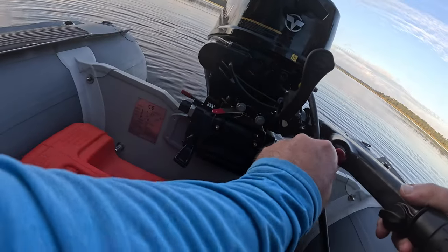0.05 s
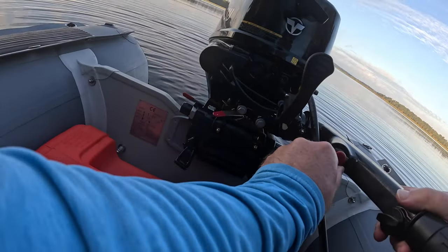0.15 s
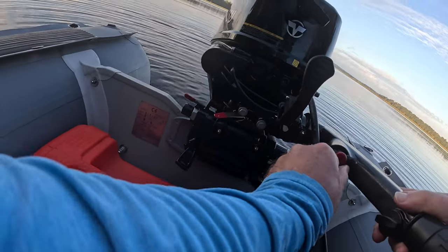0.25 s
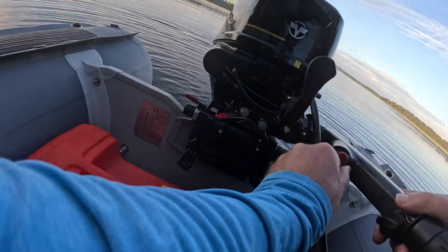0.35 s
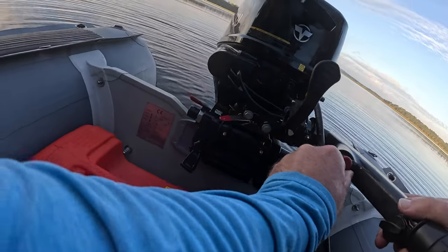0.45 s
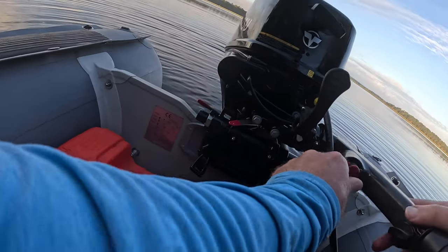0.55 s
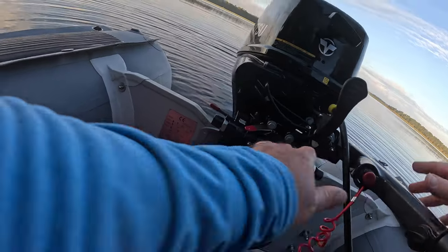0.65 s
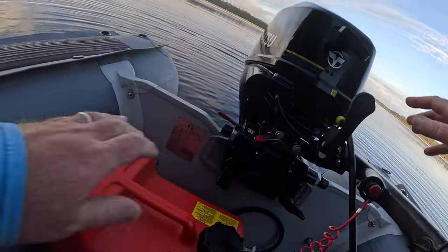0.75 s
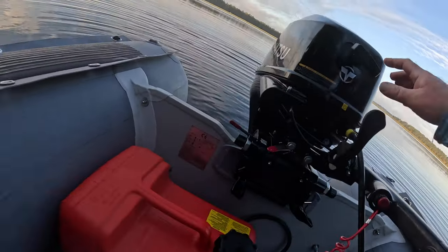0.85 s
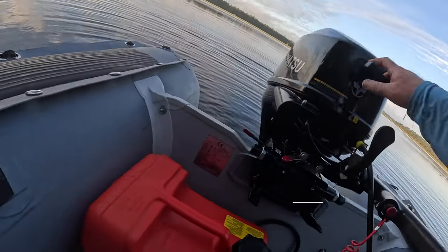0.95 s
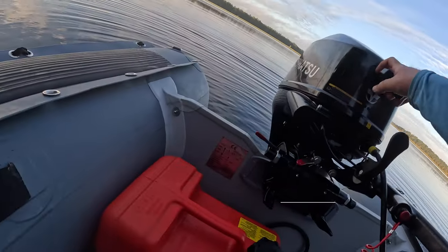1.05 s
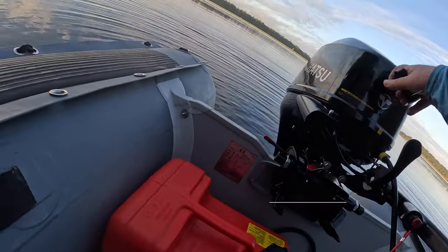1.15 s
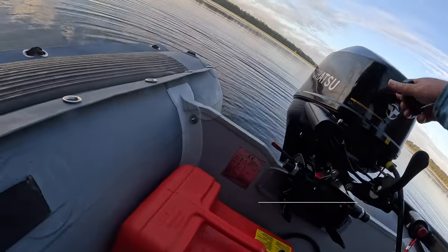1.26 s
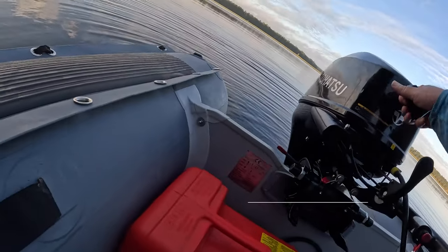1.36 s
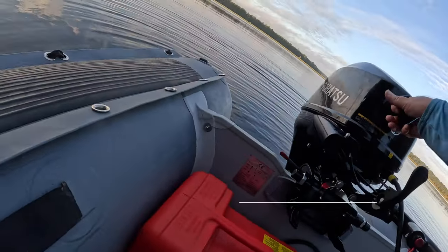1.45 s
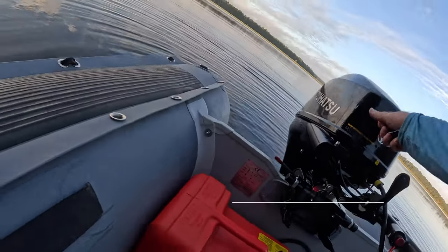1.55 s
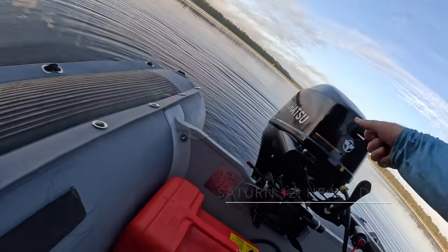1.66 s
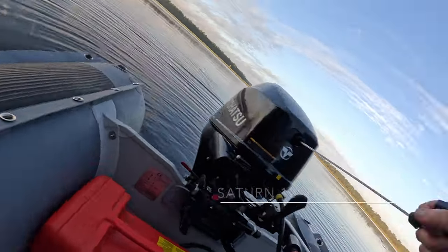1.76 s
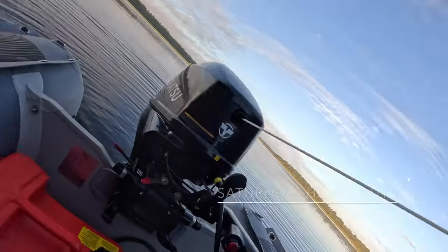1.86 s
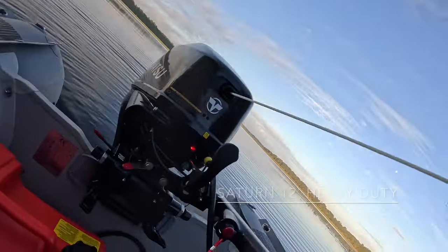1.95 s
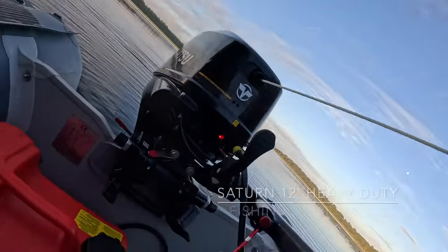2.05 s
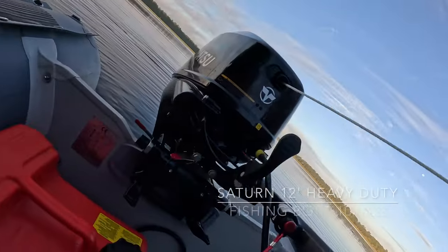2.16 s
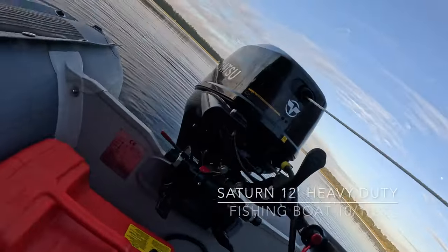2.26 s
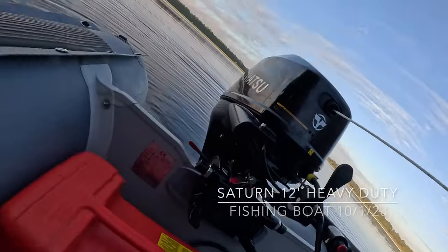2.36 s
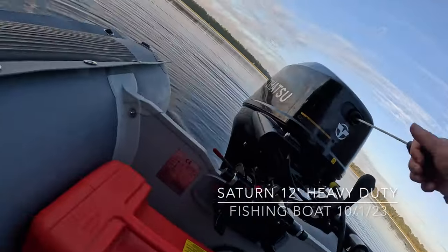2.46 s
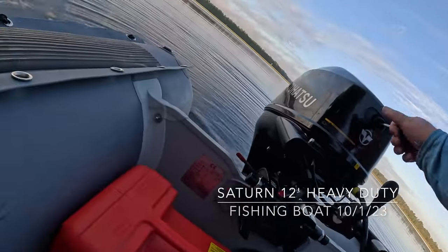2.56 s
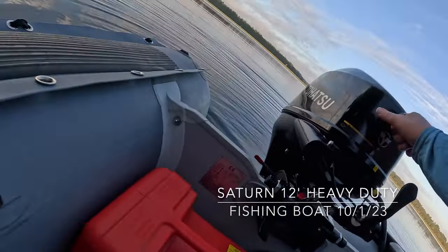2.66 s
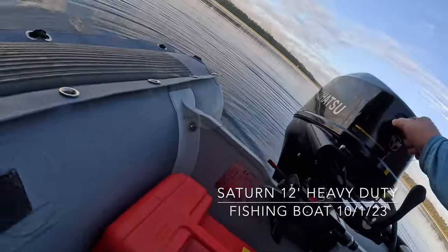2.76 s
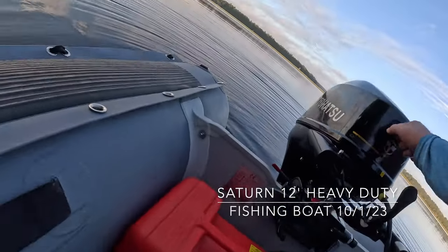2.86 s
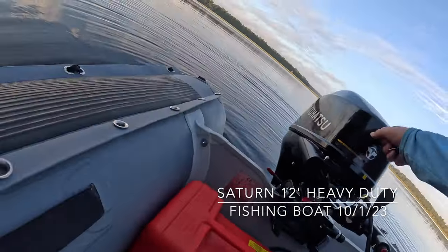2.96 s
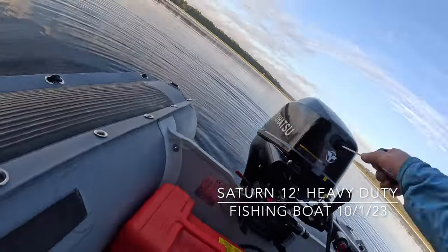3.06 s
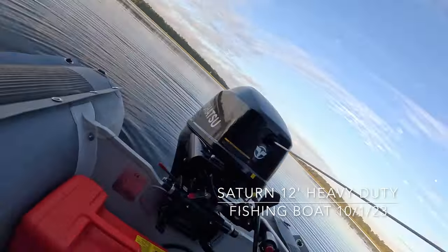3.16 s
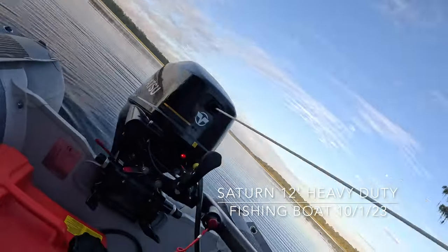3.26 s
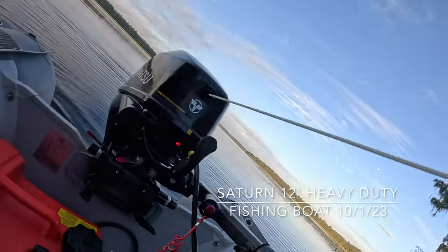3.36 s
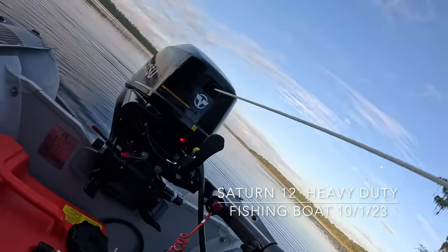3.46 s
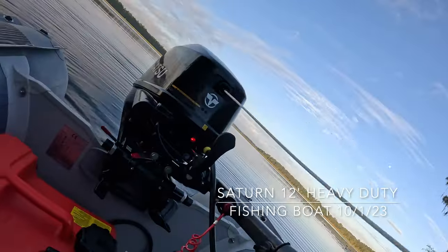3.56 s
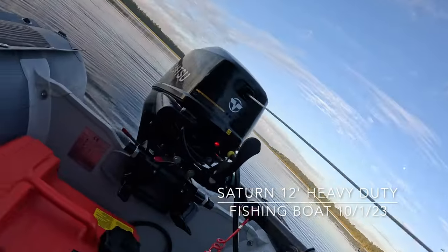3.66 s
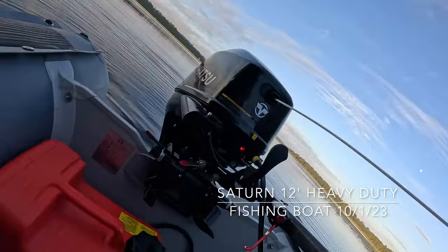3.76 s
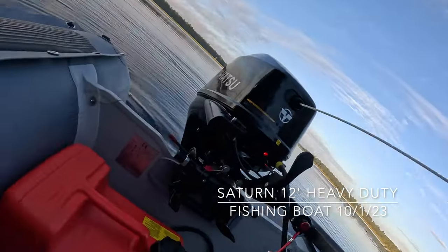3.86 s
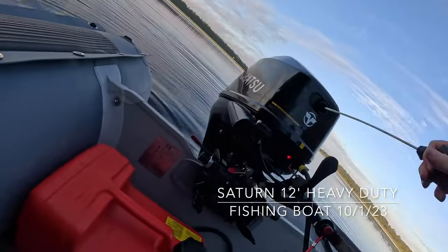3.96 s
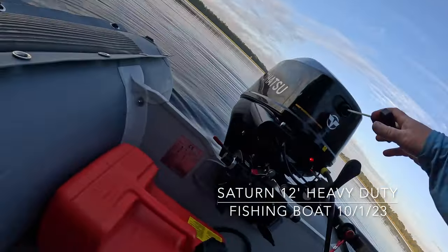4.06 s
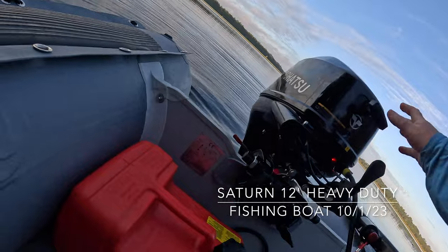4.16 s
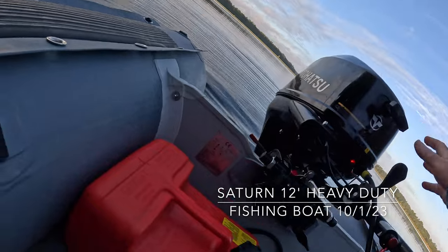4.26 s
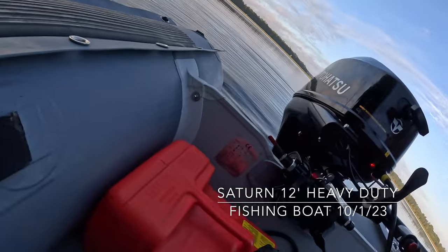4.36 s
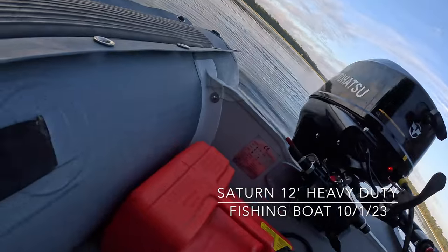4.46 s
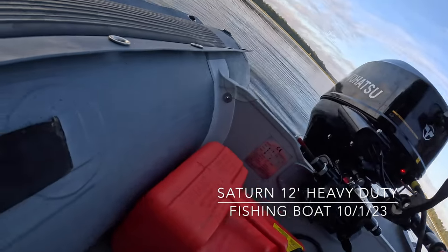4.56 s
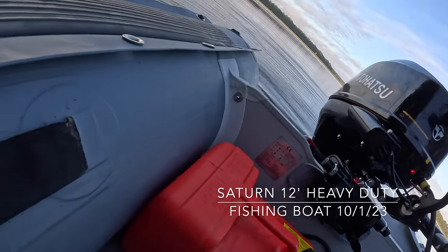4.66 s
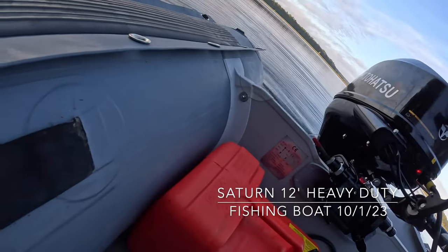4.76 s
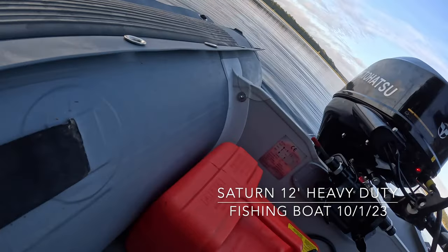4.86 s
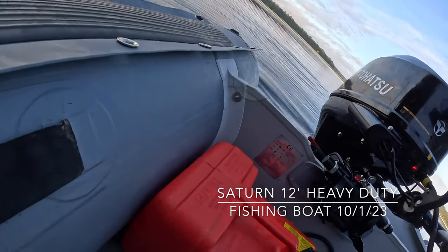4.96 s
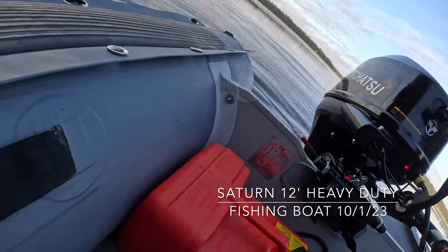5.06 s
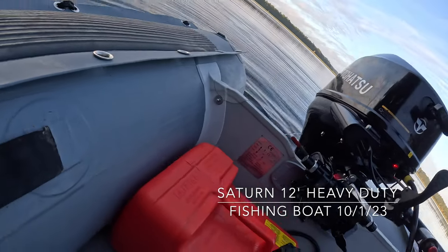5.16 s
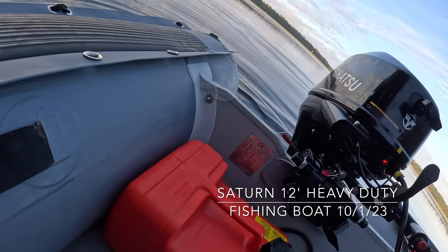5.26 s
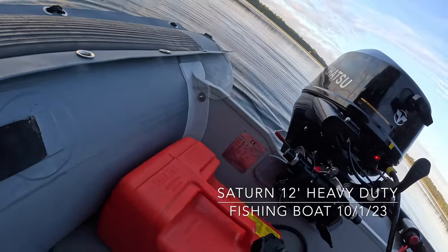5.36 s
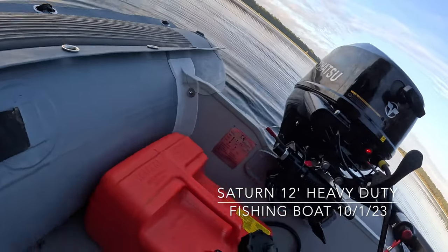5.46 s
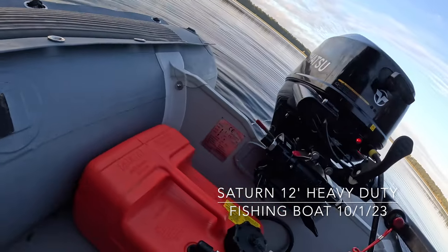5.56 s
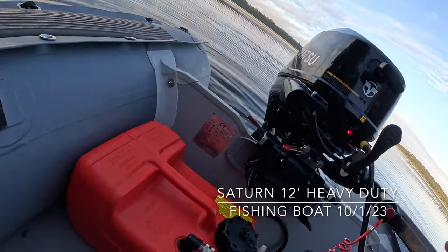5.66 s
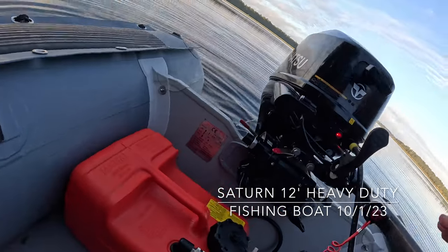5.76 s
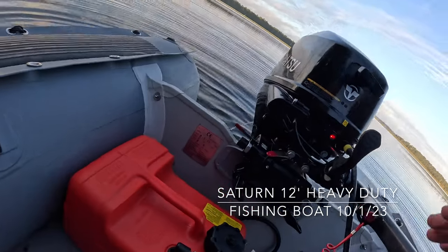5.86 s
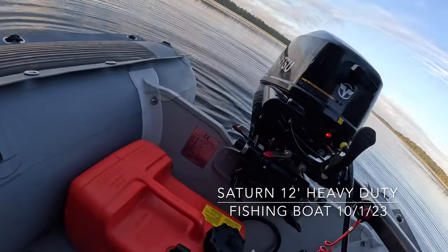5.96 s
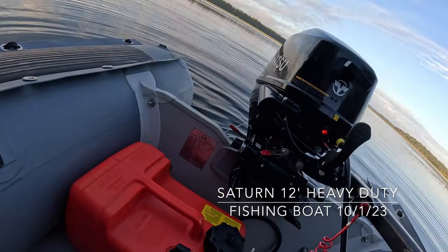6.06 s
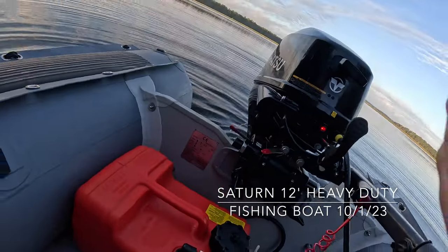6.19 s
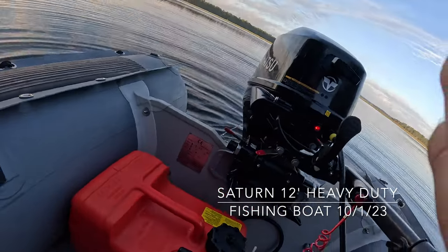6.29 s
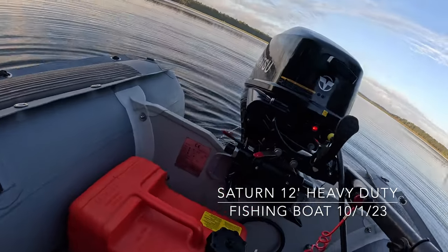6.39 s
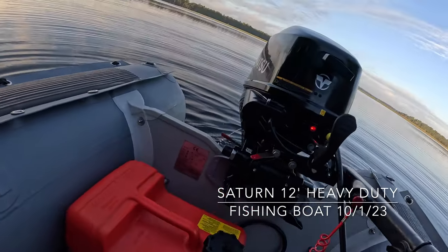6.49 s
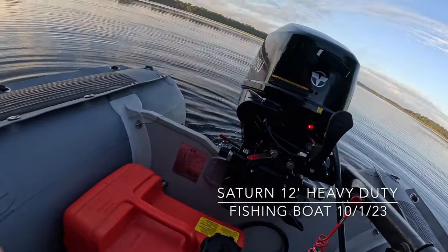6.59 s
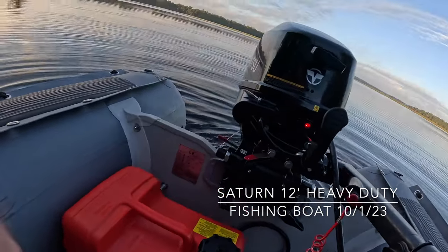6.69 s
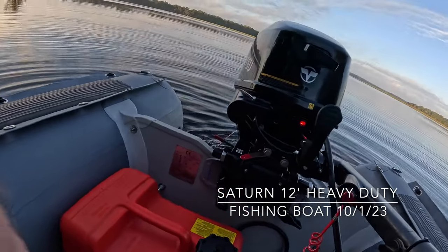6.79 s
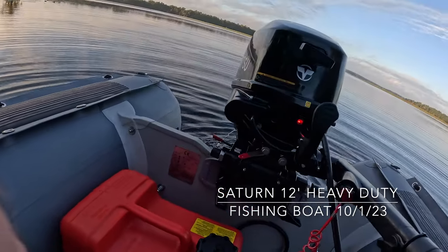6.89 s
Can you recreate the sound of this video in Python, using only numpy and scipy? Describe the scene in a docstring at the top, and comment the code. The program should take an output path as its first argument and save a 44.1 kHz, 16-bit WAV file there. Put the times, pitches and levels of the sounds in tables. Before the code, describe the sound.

For the first 1.5 seconds, hands and sleeves rustle faintly, with small clicks and hollow bumps on an inflatable boat, all heard close. At about 1.5 seconds a knock begins the first pull of an outboard motor's rope: the starter clunks at 1.7, the rope whirrs upward in pitch, and the engine puffs air without firing. The rope rewinds with small squeaks and several knocks. The second pull starts around 2.9 seconds, with another clunk, a whirr, low water gulps and ragged sputtering. At 3.7 seconds the motor catches and quickly picks up speed, and a sharp knock sounds at about 4.1. It then idles steadily with a low throb, exhaust bubbling under water and valves ticking beneath a rattling cover. A smaller thump comes near 5.8 seconds. The idle gradually slows, and the cover hums faintly from 6.4 until the end, around 7 seconds.

```python
"""Starting a small outboard motor on an inflatable boat. First, hands rustle and knock on the boat.
The rope is pulled at about 1.5 s and again at about 2.9 s: the starter clunks, the rope whirrs and
rewinds, and the engine puffs air. On the second pull it sputters, and at about 3.7 s it catches.
Then it idles: each firing shakes the hull and blows an exhaust bubble under water, while valves tick
under the rattling cowl (the engine's cover). Near the end it slows down and the cowl hums."""
import sys
import numpy as np
from scipy import signal
from scipy.fft import rfft, irfft, next_fast_len
from scipy.io import wavfile
from scipy.ndimage import map_coordinates

SR = 44100
rng = np.random.default_rng(int(sys.argv[2]) if len(sys.argv) > 2 else 0)


def to_wav(s):
    """Save 16-bit WAV."""
    ch = np.atleast_2d(s).T  # columns
    pcm = np.round(np.clip(ch, -1, 1) * 32767)  # PCM
    wavfile.write(sys.argv[1], SR, pcm.astype(np.int16))


N = 305613
FIRST_FIRING_S = 3.692
STEP = 16  # samples per step of a slow curve

# Engine speed. Each row: time in seconds, firings per second (one per turn).
ENGINE_SPEED = [(3.69, 16.08), (3.785, 16.97), (3.835, 20.17), (3.88, 21.31), (3.93, 24.12), (4.0, 23.97),
                (4.3, 24.96), (4.95, 25.23), (5.2, 25.22), (5.35, 24.73), (5.59, 24.69), (5.73, 24.15),
                (6.0, 23.45), (6.38, 22.49), (6.71, 21.79), (6.93, 21.39)]
# Pockets of exhaust gas. Each row: break time in seconds, hold in seconds, level in dB, base pitch in Hz.
GAS_POCKETS = [(3.959, 0.23, -21, 182.3), (4.162, 0.093, -14, 169.4), (4.378, 0.065, -15, 159.4),
               (4.578, 0.051, -17.5, 157), (4.789, 0.047, -18.5, 170.5), (5.064, 0.092, -20, 173),
               (5.316, 0.078, -19, 178), (5.578, 0.13, -18.5, 178), (5.726, 0.021, -18, 192),
               (6.016, 0.043, -18, 172), (6.212, 0.09, -18.5, 159), (6.427, 0.16, -23, 185.4),
               (6.58, 0.095, -19.5, 182), (6.811, 0.17, -18.5, 192.5), (6.95, 0.07, -19, 180)]
# Tone of the exhaust leg. Each row: frequency in Hz, relative level in dB of a harmonic there.
THROB_TONE = [(50, -50), (75, -44), (100, -39), (125, -33), (150, -27), (175, -35), (210, -48)]
# Loudness of the cowl. Each row: time in seconds, relative rattle level in dB, relative tick level in dB.
COWL_LEVELS = [(3.69, -33, -40.5), (3.93, -28, -39.5), (4.13, -32.5, -44.5), (4.32, -32, -45.5),
               (4.89, -30.5, -47), (5.18, -30.5, -43.5), (5.54, -30.5, -44), (5.95, -34.5, -43),
               (6.27, -33, -43), (6.53, -32.5, -37), (6.7, -32, -40.5), (6.93, -32.5, -44)]
# Modes (ringing tones) of the engine block. Each row: pitch in Hz, width in Hz, then levels in dB at
# fast idle, at low idle and while catching.
BLOCK_MODES = [(313, 29.4, 4, 2, 4.5), (439.2, 22.8, 3.5, -13, -19), (541, 24.4, 2, -28, 0.5),
               (701, 21, -3.5, -7.5, -3), (778.6, 20, -2, -4.5, -20), (1059, 55, -7, -15, -2),
               (1232, 57, -6, -10.5, -3), (1720, 79, -10, -14.5, -11), (2734, 31, -15, -14, -25),
               (4370, 60, -27, -24, -33), (5780, 50, -24, -36, -31)]
# Modes of struck parts. Each row: pitch in Hz, relative level in dB, seconds to fade by 60 dB (t60).
VALVE_MODES = [(4400, -2, .04), (5100, -3, .03), (5650, -2, .04), (6190, -3, .03), (6480, -1.5, .04),
               (6950, -4, .03), (7600, -5, .03), (8350, -10, .03), (9800, -10, .025)]
STARTER_MODES = [(137, 0, .13), (235, -1, .08), (350, 2, .045), (480, -6, .035), (780, -4, .045),
                 (1060, -2, .035), (1400, -9, .025), (2300, -15, .015)]
COWL_MODES = [(800, -10, .018), (980, 3, .024), (1210, 6, .02), (1437, 3, .022), (1680, -3, .02),
              (2000, -9, .02), (2300, -17, .02), (2700, -19, .015), (3200, -21, .015)]
TRANSOM_MODES = [(125, 0, .09), (225, -2, .06), (340, -6, .04), (471, -5, .035)]  # the board that holds the motor
HULL_MODES = [(165, -11, 0.17), (254, -0.5, 0.054), (349, -3.5, 0.039), (586, -4.5, 0.029),
              (874, -2.5, 0.02), (1150, -9, 0.023), (1650, -17, 0.016), (2600, -17, .012),
              (3950, -17, .008), (5800, -30, .006)]
# Colours of noise. Each row: frequency in Hz, relative strength there in dB.
RATTLE_NOISE = [(150, 1.5), (260, 4), (326, 0.5), (388, -22), (434, -5), (495, -6), (549, -5), (608, -0.5),
                (761, -6.5), (925, -10.5), (1220, -13.5), (1470, -21.5), (1710, -19.5), (1910, -16),
                (3000, -28.5), (3900, -68), (6600, -120)]
LOW_IDLE_NOISE = [(150, -18), (260, 11), (297, -8), (396, -1.5), (490, -12), (554, -1.5), (633, -10.5),
                  (680, -5.5), (785, -2.5), (993, -4.5), (1230, -2.5), (1340, -18), (1620, -8.5),
                  (1930, -20), (3000, -25), (3900, -20), (6600, -120)]
TICK_NOISE = [(1180, -4.5), (2000, 3.5), (2480, -0.5), (2700, -0.5), (3260, 1), (4430, -1.5), (5350, -6.5),
              (7600, -8.5), (8420, -13), (9490, -12), (10600, -11), (13600, -6.5), (15400, -45)]
WATER_NOISE = [(18, -32), (30, -31), (50, -19), (87, -18), (172, -12.5), (260, -23), (300, -36), (390, -56),
               (660, -120)]
PUFF_NOISE = [(1470, 5), (2500, 0.5), (4430, -4), (5440, -1), (6290, 0), (7610, -1), (9340, -7),
              (10200, -6.5), (14100, -11), (15400, -41)]
SWAY_NOISE = [(10, -3), (20, 4), (50, -1.5), (90, -9), (200, -57.5)]
HULL_NOISE = [(41, -37), (70, 3), (145, 7.5), (260, -6.5), (340, -18), (570, -120)]
AIR_TUBE_NOISE = [(200, -51), (260, -7), (330, -4), (390, -5.5), (450, -28), (650, -48)]
RUB_NOISE = [(240, -2), (400, -3), (484, -1.5), (533, -4.5), (613, -6), (868, -5), (1220, -2.5), (1900, -8),
             (3200, -15), (4160, -24), (7040, -120)]
HISS_NOISE = [(1470, 9), (2500, -3), (2780, 6.5), (4000, 8), (4360, 8), (5000, 7), (7500, -4), (9750, -30),
              (16500, -120)]
FIZZ_NOISE = [(4120, -15), (7000, -3.5), (8260, -7), (9620, -8), (10800, -11), (12700, 1.5), (14600, -20),
              (15400, -33)]
# Short events. Each row: time in seconds, level in dB.
WEAK_FIRINGS = [(3.325, -23), (3.39, -19.5), (3.455, -17.5), (3.515, -17), (3.569, -24.5), (3.641, -24.5),
                (3.715, -15.5), (3.761, -15), (3.825, -14)]
CRANKING_PUFFS = [(1.839, -36), (1.886, -32), (1.962, -35.5), (2.013, -37), (2.071, -54), (3.181, -32.5),
                  (3.274, -32), (3.301, -34), (3.392, -28), (3.545, -35.5), (3.633, -37)]
STARTER_CLUNKS = [(1.7108, -6.5), (3.0806, -6)]
BOAT_LURCHES = [(.44, -89), (.66, -48), (.87, -45), (1.04, -35), (1.17, -32), (1.299, -54), (1.58, -40),
                (1.79, -27), (1.92, -22.5), (2.03, -32), (2.14, -33.5), (2.36, -46), (2.5, -40),
                (2.73, -41), (2.98, -37), (3.16, -32), (3.29, -24), (3.4, -23.5), (3.58, -32), (3.7, -30)]
# Gulps and plops. Each row: start in seconds, relative level in dB, pitch in Hz.
# Each gulp starts 20% below that pitch and rises through it.
WATER_GULPS = [(1.026, -24, 119), (1.11, -22, 174), (1.8, -43, 140), (1.918, -14.5, 155.6), (3.14, -12, 64),
               (3.244, -13, 153), (3.314, -12, 157), (3.373, -15, 166), (3.41, -12.5, 109),
               (3.694, -11.5, 201), (3.718, -16.5, 275.3), (3.753, -22, 198), (5.289, -13, 268),
               (5.491, -18.5, 302), (5.832, -18, 245), (6.266, -27, 366), (6.414, -18.5, 302)]
# Gliding tones. Each row: start and end in seconds, first, middle and last pitch in Hz, level in dB.
WHIRRS_AND_SQUEAKS = [(1.015, 1.065, 9250, 9250, 9250, -56), (1.105, 1.14, 9300, 9350, 9350, -62),
                      (1.745, 1.84, 1000, 1750, 2150, -35), (1.775, 1.87, 1000, 1380, 1600, -29),
                      (1.77, 1.86, 2000, 2700, 3000, -40), (1.845, 1.925, 780, 880, 880, -32),
                      (1.89, 2.0, 1550, 1420, 1330, -33), (1.878, 1.9, 6400, 6450, 6400, -38),
                      (1.96, 1.985, 7700, 7800, 7700, -38), (2.09, 2.2, 1700, 1850, 1680, -43),
                      (2.22, 2.28, 1560, 1500, 1440, -45), (2.29, 2.4, 1250, 1350, 1200, -43),
                      (2.29, 2.39, 1700, 1780, 1750, -48), (2.43, 2.52, 2030, 1880, 1700, -50),
                      (3.125, 3.225, 1000, 1420, 1780, -28), (3.13, 3.225, 1500, 2250, 2750, -32),
                      (3.15, 3.21, 620, 800, 900, -29), (3.205, 3.31, 950, 1250, 1230, -28),
                      (3.295, 3.36, 4500, 4450, 4250, -34), (3.31, 3.37, 1650, 1650, 1550, -35),
                      (3.4, 3.44, 4500, 4500, 4500, -39), (1.835, 1.86, 7300, 7400, 7300, -42),
                      (1.995, 2.035, 6300, 6200, 6100, -44), (2.268, 2.286, 1150, 1200, 1200, -36),
                      (2.308, 2.326, 2200, 2200, 2200, -41), (3.385, 3.42, 6500, 6500, 6400, -40),
                      (5.874, 5.894, 2700, 2720, 2700, -37), (3.25, 3.31, 2600, 3200, 3300, -39),
                      (3.62, 3.69, 1700, 2000, 2250, -47)]  # rope whirrs, short squeaks and one knock's ping
COWL_HUMS = [(6.44, 6.925, 805, 780, 786, -38), (6.55, 6.925, 680, 702, 749, -37.5)]
# Two rope pulls, a list for each. Each row: time in seconds, then rub, hiss and rumble levels in dB.
ROPE_PULLS = [
    [(1.48, -70, -71, -49), (1.708, -35.5, -46.5, -67), (1.714, -21.5, -32, -48),
     (1.745, -29.5, -42.5, -29), (1.8, -28, -42, -32), (1.92, -31, -36, -35), (2.0, -35.5, -43, -32),
     (2.06, -41, -44.5, -33), (2.29, -46.5, -58, -49), (2.4, -58, -66, -66)],
    [(2.87, -59, -64, -51), (3.077, -34, -47.5, -37.5), (3.084, -23.5, -32, -43), (3.12, -27, -41, -24.5),
     (3.22, -32, -36.5, -35), (3.31, -28.5, -39, -26.5), (3.4, -27.5, -32.5, -27.5),
     (3.48, -37, -39.5, -24.5), (3.6, -35.5, -44.5, -27.5), (3.66, -42.5, -41, -37.5), (3.7, -21, -46, -15)],
]
# Handle, starter catches and tiller knock. Each row: start in seconds, level in dB, thump and snap in dB
# above that level, snap pitch in Hz, scrape length in milliseconds, left minus right in dB.
HARD_KNOCKS = [(.054, -62, -1, 21, 5100, 3.5, 3), (.216, -55, -5, 5, 9100, 4.4, 17),
               (.23, -53, -2, 9, 4300, 4, 8), (.243, -56.5, -12, 12, 2500, 4, 20),
               (.259, -46, -10, 4, 7450, 4, 12), (0.285, -36.5, -11, -9, 3480, 4.9, 21),
               (0.35, -60, 0, 13, 6000, 4, 2), (.383, -46, -30, -4, 4580, 4, 11),
               (.591, -38, -2, -3.5, 5740, 3.1, -8), (1.214, -35, -6, -22, 2940, 7, -3),
               (1.447, -15.5, 5, -42, 3000, 11, -3.5), (1.69, -26, -19, -30, 3000, 10, -14),
               (1.919, -14, -3, -15, 3500, 30, 4), (1.926, -15.5, 6, -6, 3800, 42, 3.5),
               (2.023, -19, -5, -1, 2930, 22, -2), (2.128, -23.5, 5, -16, 3500, 13, 4),
               (2.189, -22.5, 4.5, -5.5, 3980, 7.6, 2), (2.203, -42.5, 10, 10, 3770, 5, -6),
               (2.258, -40.5, -12, 12, 2500, 6, -2), (2.274, -26, -20, -21, 3000, 8, 3),
               (2.325, -42, -19, 11, 4200, 8, -8), (2.485, -35, 10, -20, 3000, 8, 0.0),
               (2.598, -46, -6, -8, 3000, 6, 0.0), (2.646, -25.5, 7, -2, 2400, 24, -3.5),
               (2.684, -21.5, 2, 1.5, 2080, 11, -5), (2.694, -23.5, -6, -3, 2430, 37, 2),
               (2.815, -54, -10, 5, 7000, 6, 0.0), (2.906, -40, -2, -5, 2500, 6.7, -2),
               (2.951, -36, -15, -7, 3000, 8, 6), (3.373, -25, -13, -10, 3000, 12, -9),
               (4.1457, -6, -28, -7, 3200, 36, -4), (5.782, -22, 10.5, -7, 2980, 18, 3),
               (5.88, -31, -15, 0, 2700, 9.2, -7)]
# Dull bumps. Each row: start in seconds, peak in dB, treble tilt in dB per octave, left minus right in dB.
SOFT_BUMPS = [(.746, -26, 2.5, 4), (1.017, -25, -5.5, 1), (1.082, -16.5, 1.5, 4.5), (1.107, -16, -2, 1),
              (1.232, -33, 2, -1), (2.427, -16.5, -1, 2.5), (2.771, -25, -0.5, 3)]
# Hands and sleeves brush the boat, and the rope swishes as it rewinds. Each row: peak time in seconds,
# seconds to rise and to fall by 20 dB, then rub, hiss, rumble and fizz levels in dB.
RUSTLES = [(.05, 0.93, 0.86, -63, -69, -68, -71), (.27, 0.14, 0.17, -49, -57, -62, -61),
           (.42, 0.092, 0.074, -55, -65, -58, -75), (0.665, 0.13, 0.082, -37, -49, -39.5, -47),
           (.8, 0.11, 0.98, -45.5, -56, -57, -64.5), (.96, 0.47, 0.071, -40, -71, -43.5, -73),
           (1.03, 0.039, 0.029, -37, -53, -42, -53), (1.11, 0.1, 0.05, -42, -64, -30.5, -76),
           (1.238, 0.1, 0.11, -48.5, -56, -38.5, -75), (1.4, 0.059, 0.64, -59, -63.5, -47.5, -73),
           (2.319, 0.0096, 0.024, -36, -40.5, -54, -48), (2.46, 1, 0.32, -41, -55.5, -41.5, -61.5),
           (2.69, 0.13, 0.077, -43, -60, -33.5, -64), (2.78, 0.12, 0.22, -51.5, -60, -43.5, -68)]
# Where the hands are. Each row: time in seconds, left minus right in dB.
HAND_POSITION = [(0, .8), (.9, 1.4), (1.1, .4), (3.7, .4)]
# Width of the noises. Each row: frequency in Hz, how alike left and right are (1 is the same).
STEREO_LIKENESS = [(60, 0.99), (120, 0.98), (240, 0.99), (480, 0.88), (950, 0.9), (1890, 0.57),
                   (3770, 0.79), (7520, 0.94), (15000, 0.54)]
# Balance of the two microphones. Each row: frequency in Hz, left minus right in dB.
MIC_BALANCE = [(60, -0.2), (130, -0.5), (290, -1), (640, -1.5), (1410, 0.0), (3100, 0.3), (6820, 1.5),
               (15000, 5)]
# Their treble loss. Each row: frequency in Hz, gain in dB.
MIC_TREBLE = [(10000, -0.5), (13000, -17.5), (15600, -12)]


def engine():
    """The running motor: shaking, exhaust, cowl noise and churned water, from the first firing on."""
    rate, turns = shaft()
    low_idle = np.pi / 2 * np.clip((23.6 - rate) / 1.19, 0, 1)  # blend angle: 0 fast, pi/2 slow
    motor = vibration(rate, turns, low_idle) + exhaust(rate, low_idle, turns) + cowl(turns, low_idle)
    water = amp(-34 + 1.5 * wobble(8)) * noise(WATER_NOISE, flicker_db=1.5, rate=20)
    return running(fade_s=0.0024) * (motor + water)


def shaft():
    """The shaft's turns per second, and its turns counted from the first firing."""
    rate, = curves(ENGINE_SPEED)
    turns = np.cumsum(rate) / SR
    return rate, turns - turns[round(FIRST_FIRING_S * SR)]


def vibration(rate, turns, low_idle):
    """Harmonics (multiples) of the firing rate: 1 and 2 shake the hull, 3 to 8 throb in the exhaust."""
    def harmonic(k, db):
        phase = k * (2 * np.pi * turns - 1) + 6.53 + 0.038 * wobble(2.25)
        return np.sqrt(2) * amp(db) * np.sin(phase)

    uneven_db = 8.5 * np.sin(low_idle) * wobble(8)
    shake = harmonic(1, -25 + 1.9 * (rate - 25) + uneven_db) + harmonic(2, -27.5 + .9 * (rate - 25))
    throb = sum(harmonic(k, at_hz(THROB_TONE, k * rate) + 1.5 * wobble(4)) for k in range(3, 9))
    pocket_db, _ = gas_pockets()
    slowing_db = 2.6 * np.clip(24 - rate, 0, 3) * (turns > 20)
    return shake + amp(1.5 + .6 * (pocket_db + 21) - slowing_db) * throb


def exhaust(rate, low_idle, turns):
    """Each firing blows a bubble that tears off the outlet after about one turn."""
    out = np.zeros(N)
    pocket_db, base_hz = gas_pockets()
    firings = np.searchsorted(turns, np.arange(int(turns[-1]) + 1))
    for i, (late, size, tune) in zip(firings, rng.standard_normal((len(firings), 3))):
        hz = 1.01 * base_hz[i] * (1 + 0.033 * tune - 0.0131 * (pocket_db[i] + 19))  # fuller is lower
        life_s = (.85 + .3 * np.sin(low_idle[i])) / rate[i]
        blub = bubble(hz, rise=1.7, t60=0.3, life_s=life_s)
        add(out, i / SR + 0.0018 + 0.00023 * late, amp(1.4 * size) * blub)
    bubbles = unit(out) * amp(pocket_db - 5.5)
    # a faint delayed copy spreads the exhaust between left and right
    width = amp(-29) * np.outer([1, -1], np.roll(bubbles, 70))
    return bubbles + width


def gas_pockets():
    """Exhaust gas gathers, holds and breaks away. Gives its level in dB and base pitch in Hz."""
    swells = [db + swell(s, 111, 308, hold) for s, hold, db, _ in GAS_POCKETS]
    trickle_db = -35
    *_, base_hz = curves(GAS_POCKETS)
    return 20 * np.log10(combined_gain(swells + [trickle_db])), base_hz


def bubble(hz, rise, t60, life_s=1):
    """A bubble starts softly, rises in pitch as it nears the surface and dies off after its life."""
    t = seconds(SR // 8)
    envelope = (1 - np.exp(-(t / 0.01) ** 2)) * amp(-60 * t / t60) / (1 + (t / life_s) ** 5)
    return envelope * np.sin(2 * np.pi * hz * (t + rise * t * t))


def cowl(turns, low_idle):
    """Ticking and rattling under the cover pulse in step with the shaft."""
    def pulse(place, sharpness):
        return np.exp(sharpness * (np.cos(2 * np.pi * (turns - place)) - 1))

    rattle_db, tick_db = curves(COWL_LEVELS)
    intake = pulse(place=0.08, sharpness=7)
    valve = pulse(place=0.6, sharpness=12) * (1 + 0.2 * np.sin(np.pi * turns))  # two unequal cylinders
    hiss = metallic(noise(TICK_NOISE, flicker_db=2.5, rate=200))
    ticks = unit(1 + 0.22 * intake + 0.2 * valve) * hiss
    fast = np.cos(low_idle) * noise(RATTLE_NOISE, flicker_db=0.5, rate=54)
    slow = np.sin(low_idle) * noise(LOW_IDLE_NOISE, flicker_db=1, rate=89)
    rattle = unit(1 + 0.4 * valve) * amp(2 + 2 * settled()) * (fast + slow)
    clatter = amp(-2) * valve_clatter(turns, low_idle)
    return amp(tick_db + 0.5) * ticks + amp(rattle_db - 4) * (rattle + clatter)


def valve_clatter(turns, low_idle):
    """Valves strike at five places in each turn, most harder every other turn, and ring the block."""
    def block_response(f):
        return sum((-1) ** k * amp(levels)[:, None] * 1j * f * width / (hz ** 2 - f * f + 1j * f * width)
                   for k, (hz, width, *levels) in enumerate(BLOCK_MODES))

    blows, count = np.zeros(N), np.arange(int(turns[-1]) - 1)
    for place, db, alternate_db in [(.1, -5, -1), (.36, -9, 0), (.53, -2, 2), (.66, -4, 1.5), (.88, -4, 1)]:
        at = np.searchsorted(turns, count + place + rng.normal(0, .01, len(count)))
        blows[at] = amp(db + .7 * rng.standard_normal(len(at)) + alternate_db * (-1) ** count)
    scuff = rng.standard_normal(N) * np.convolve(blows, np.hanning(SR // 200), "same")  # 5 ms contacts
    fast, slow, catching = filtered(0.36 * blows + 0.032 * scuff, block_response)
    fast = settled() * fast + (1 - settled()) * catching
    return unit(np.cos(low_idle) * fast + np.sin(low_idle) * slow)


def valve_pings():
    """Valves ring as they close, a little differently each time and softer as the engine settles."""
    out, t, turns = np.zeros(N), seconds(SR // 20), shaft()[1]
    count = np.arange(int(turns[-1]))

    def times(place):
        return np.searchsorted(turns, count + place + rng.normal(0, .02, len(count))) / SR

    cold_db, cold_s = 5.5, 0.98  # louder until just after the catch
    closings = [(s, cold_db) for s, _ in CRANKING_PUFFS]
    closings += [(s, cold_db * np.exp((FIRST_FIRING_S - s) / cold_s)) for s in times(0.072)]
    closings += [(s, -1) for s in times(.62)[1::2]]  # the other valve
    for s, extra_db in closings:
        ping_db = -49 + extra_db - 1.5 * max(s - FIRST_FIRING_S, 0)
        strengths, tunings = rng.standard_normal((2, len(VALVE_MODES)))
        for (hz, db, t60), strength, tune in zip(VALVE_MODES, strengths, tunings):
            envelope = amp(ping_db + db + 5 * strength - 60 * t / t60)
            add(out, s, envelope * np.sin(2 * np.pi * hz * (1 + .035 * tune) * t))
    return out


def metallic(hiss, width_hz=140):
    """Makes a hiss sing at the pitches of the valves."""
    def response(f):
        peaks = sum(amp(2 * (db - 1)) / (1 + (2 * (f - hz) / width_hz) ** 2) for hz, db, _ in VALVE_MODES)
        return np.sqrt(1 + peaks)

    return unit(filtered(hiss, response))


def sputters(burn_t60=0.079):
    """The engine half catches: weak, ragged firings ring the block, mostly its low modes."""
    out, t = np.zeros(N), seconds(SR // 5)
    modes = [(hz, db - 7 * np.log2(hz / BLOCK_MODES[0][0]), np.log(1000) / np.pi / width)
             for hz, width, *_, db in BLOCK_MODES]
    for s, db in WEAK_FIRINGS:
        block = ring(modes, t)
        burn = rng.standard_normal(len(t)) * t * amp(-60 * t / burn_t60)
        add(out, s, amp(db) * unit_peak(signal.fftconvolve(block, burn)[:len(t)]))
    return out


def intake_puffs(puff_s=0.017):
    """The intake puffs air during the pulls, then ever more softly on the first 20 firings."""
    envelope, t, turns = np.zeros(N), seconds(SR // 10), shaft()[1]
    firings = [(np.searchsorted(turns, k) / SR, -28.5 - 1.35 * k + rng.normal(0, 0.5)) for k in range(20)]
    for s, db in CRANKING_PUFFS + firings:
        add(envelope, s, amp(db) * np.clip(t / 0.00068, 0, 1) / (1 + (t / puff_s) ** 4))
    return envelope * metallic(noise(PUFF_NOISE, flicker_db=0.5, rate=220))


def gulps():
    """Single bubbles: the exhaust gulps during the pulls, and later the wake plops."""
    out = np.zeros(N)
    for s, db, hz in WATER_GULPS:
        add(out, s, amp(db + 8) * bubble(.8 * hz, rise=8.46, t60=0.086))
    return out


def starter_clunks(rise_cycles=.2):
    """The starter's catch ticks, then takes the load: the housing's low modes ring 2 ms later."""
    out, t = np.zeros(N), seconds(SR // 6)
    for s, db in STARTER_CLUNKS:
        clunk = 0
        for hz, mode_db, t60 in STARTER_MODES:
            age = np.clip(t - .002 * (hz < 600), 0, None)
            attack = 1 - np.exp(-age * hz / rise_cycles)
            decay = amp(mode_db + rng.normal(0, 1) - 60 * age / t60)
            clunk = clunk - attack * decay * np.sin(2 * np.pi * hz * age)
        add(out, s, amp(db) * unit_peak(clunk))
    return out


def whirrs(rows, waver_hz, rate):
    """Unsteady gliding tones that whirr, squeak or hum; below 3000 Hz they get a soft octave on top."""
    out = np.zeros(N)
    waver, flicker = wobble(rate), wobble(.7 * rate)
    for start, end, first, middle, last, db in rows:
        u = np.linspace(-1, 1, round((end - start) * SR))  # progress through the tone
        at = slice(round(start * SR), round(start * SR) + len(u))
        glide = middle + u * (last - first) / 2 + u * u * ((first + last) / 2 - middle)
        hz = glide + waver_hz * waver[at]
        phase = 2 * np.pi * np.cumsum(hz) / SR
        tone = np.sin(phase) + amp(-16.5) * (hz < 3000) * np.sin(2 * phase)
        out[at] += amp(db + 4.5 * flicker[at]) * (1 - u ** 4) * tone
    return out


def knocks(blow_t60=.0025):
    """Each contact is a blow and a short scrape: it rings the cowl, snaps and thumps the transom."""
    out, t = np.zeros((2, N)), seconds(SR // 7)
    for s, db, thump_db, snap_db, snap_hz, scrape_ms, pan_db in HARD_KNOCKS:
        blow = rng.standard_normal(len(t)) * (amp(-60 * t / blow_t60) + amp(-3 - 60000 * t / scrape_ms))
        band = signal.iirpeak(snap_hz, Q=2.2, fs=SR)
        snap = amp(snap_db) * unit_peak(signal.lfilter(*band, signal.lfilter(*band, blow)))
        shell = unit_peak(signal.fftconvolve(ring(COWL_MODES, t), blow)[:len(t)])
        thump = amp(thump_db) * ring(TRANSOM_MODES, t) * (1 - np.exp(-t / 0.0039))
        add(out, s, amp(db) * ((shell + snap) * pan(pan_db) + thump))
    return out


def bumps():
    """Hand and handle bump the hollow hull, which rings a little differently at each spot."""
    out, t = np.zeros((2, N)), seconds(SR // 8)
    for s, db, tilt_db, pan_db in SOFT_BUMPS:
        modes = [(hz * (1 + rng.normal(0, .04)), mode_db + tilt_db * np.log2(hz / HULL_MODES[1][0]), t60)
                 for hz, mode_db, t60 in HULL_MODES]
        add(out, s, amp(db) * ring(modes, t) * pan(pan_db))
    return out


def handling():
    """Until the engine fires, cloth and rope rub and hiss, the boat sways and its air tubes rumble."""
    t = seconds(N)[::STEP]
    brushes = combined_gain([np.add.outer(levels, swell(s, 20 / rise, 20 / fall))
                             for s, rise, fall, *levels in RUSTLES])
    pulls_db = [np.where((t > pull[0][0]) & (t < pull[-1][0]), np.array(curves(pull))[:, ::STEP], -120)
                for pull in ROPE_PULLS]
    rope_rub, rope_hiss, crank = combined_gain(pulls_db)
    rope_fizz = amp(-45.5) * (rope_hiss / amp(-40)) ** 1.3
    rub, hiss, rumble, fizz = np.hypot(brushes, [rope_rub, rope_hiss, crank, rope_fizz])
    sway = combined_gain([db + swell(s, 164, 164) for s, db in BOAT_LURCHES])  # weight shifts, rope tugs
    drumming = combined_gain([db + thump_db - 29 + swell(s, 1800, 20 / .06)
                              for s, db, thump_db, *_ in HARD_KNOCKS if s < FIRST_FIRING_S])
    tubes = np.hypot(amp(-8) * rumble, drumming)
    # hypot with a set level keeps the faint sound of the boat at rest
    sound = (np.hypot(amp(-50.5), sway) * noise(SWAY_NOISE, flicker_db=1.5, rate=7.65)
             + np.hypot(amp(-51.5), rumble) * noise(HULL_NOISE, flicker_db=4.5, rate=44)
             + np.hypot(amp(-62), tubes) * noise(AIR_TUBE_NOISE, flicker_db=5, rate=15)
             + amp(-6.5) * crank * noise(RATTLE_NOISE, flicker_db=1, rate=40)
             + rub * noise(RUB_NOISE, flicker_db=2.5, rate=90)
             + hiss * noise(HISS_NOISE, flicker_db=3, rate=90)
             + np.hypot(amp(-94), fizz) * noise(FIZZ_NOISE, flicker_db=2, rate=120))
    return (1 - running(fade_s=0.014)) * pan(curves(HAND_POSITION)[0]) * sound


def running(fade_s):
    """Fades from 0 to 1, arriving at the first firing."""
    return np.clip((seconds(N) - FIRST_FIRING_S) / fade_s + 1, 0, 1)


def settled(idle_from_s=4.12, fade_s=0.3):
    """0 while the engine catches, 1 once it idles."""
    return np.clip((seconds(N) - idle_from_s) / fade_s + 1, 0, 1)


def ring(modes, t):
    """A struck object: fading tones, each a bit stronger or weaker on every hit."""
    return unit_peak(sum(amp(db + rng.normal(0, 2.5) - 60 * t / t60) * np.sin(2 * np.pi * hz * t)
                         for hz, db, t60 in modes))


def noise(colour, flicker_db, rate):
    """Stereo noise whose level flickers rate times a second."""
    def response(hz):
        spread = np.arccos(np.clip(at_hz(STEREO_LIKENESS, hz), -1, 1)) / 2
        return amp(at_hz(colour, hz)) * [np.cos(spread), np.sin(spread)]

    mid, side = filtered(rng.standard_normal((2, N)) * amp(flicker_db * wobble(rate)), response)
    return unit(np.array([mid + side, mid - side]))


def wobble(rate):
    """A smooth random curve through rate new values a second."""
    steps = np.arange(0, N + STEP, STEP)
    values = rng.standard_normal(int(N * rate / SR) + 4)
    return np.interp(np.arange(N), steps, map_coordinates(values, [steps * rate / SR]))


def swell(s, rise_db_per_s, fall_db_per_s, hold=0):
    """A level that rises to 0 dB, holds until time s, then falls."""
    t = seconds(N)[::STEP] - s
    return -np.maximum(rise_db_per_s * (-t - hold), fall_db_per_s * t).clip(0)


def combined_gain(levels_db):
    """Adds the power of unrelated sounds and gives one gain per sample."""
    return np.repeat(np.sqrt(sum(amp(2 * db) for db in levels_db)), STEP, axis=-1)[..., :N]


def curves(rows):
    """One value per sample for each column after the time."""
    times, *columns = np.transpose(rows)
    return [np.interp(seconds(N), times, column) for column in columns]


def at_hz(rows, hz):
    """Reads between the rows of a frequency table, on a log scale."""
    frequencies, values = np.transpose(rows)
    return np.interp(np.log(hz + 1), np.log(frequencies + 1), values)


def filtered(x, response):
    """Scales each frequency in x by response(frequency)."""
    size = next_fast_len(N + SR // 2)
    return irfft(rfft(x, size) * response(np.fft.rfftfreq(size, 1 / SR)), size)[..., :N]


def add(out, s, x):
    """Mixes x into out from time s."""
    part = out[..., round(s * SR):][..., :x.shape[-1]]
    part += x[..., :part.shape[-1]]


def pan(db):
    """Left and right gains that are db apart."""
    return amp(np.outer([.5, -.5], db))


def seconds(samples):
    return np.arange(samples) / SR


def amp(db):
    return 10 ** (np.asarray(db) / 20)


def unit(x):
    """Scales x to an average power of 1."""
    return x / np.sqrt(np.mean(x ** 2) + 1e-20)


def unit_peak(x):
    return x / np.abs(x).max()


def scene():
    """Motor, rope and boat sounds mixed together."""
    tones = whirrs(WHIRRS_AND_SQUEAKS, waver_hz=37.6, rate=160)
    hum = whirrs(COWL_HUMS, waver_hz=8.3, rate=44)
    return (engine() + handling() + knocks() + starter_clunks() + bumps()
            + intake_puffs() + gulps() + sputters() + valve_pings() + tones + hum)


def record(dry):
    """The two microphones differ in tone, dull the top octave and keep nothing above 15600 Hz."""
    return filtered(dry, lambda hz: pan(at_hz(MIC_BALANCE, hz)) * amp(at_hz(MIC_TREBLE, hz)) * (hz < 15600))


dry = scene()
out = record(dry)
to_wav(out)
```